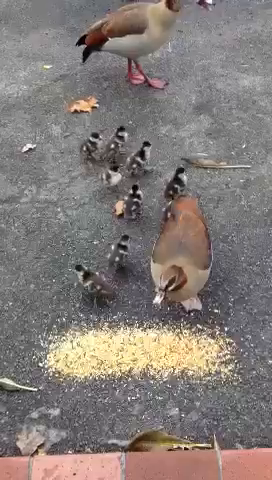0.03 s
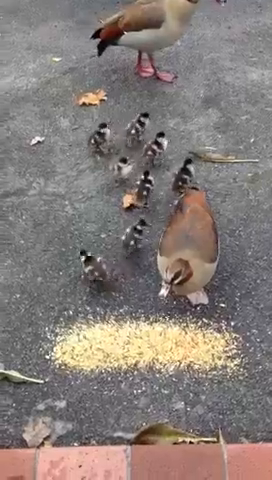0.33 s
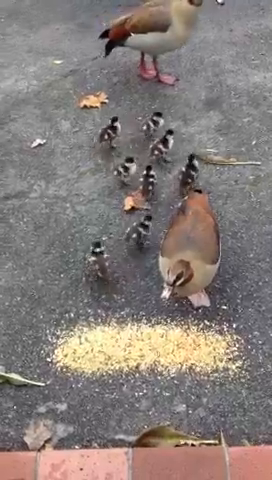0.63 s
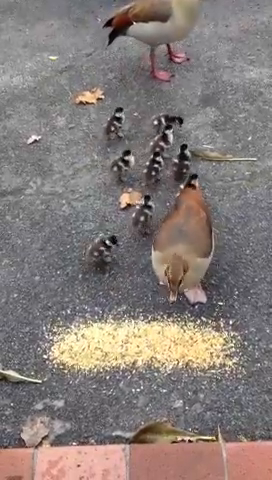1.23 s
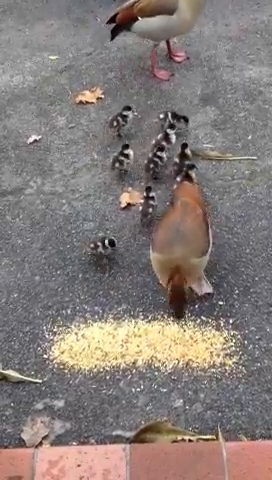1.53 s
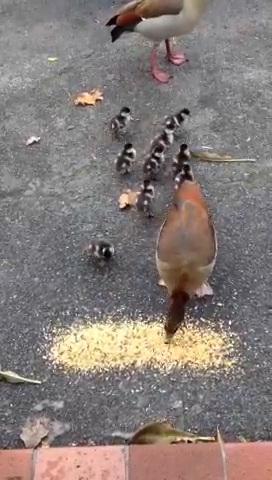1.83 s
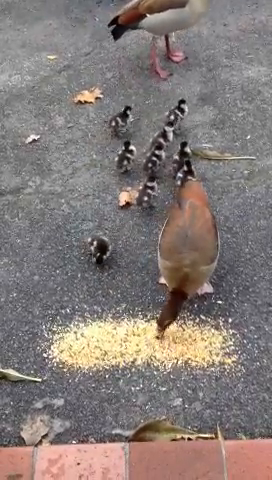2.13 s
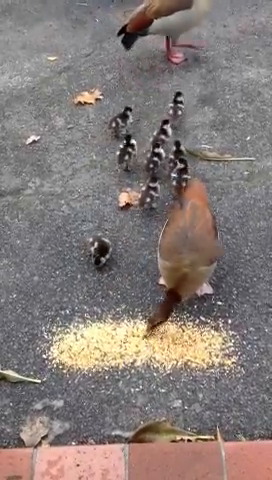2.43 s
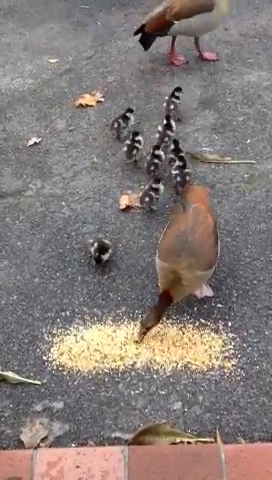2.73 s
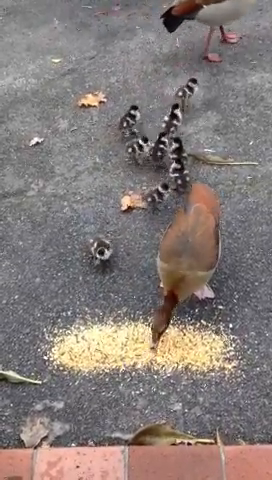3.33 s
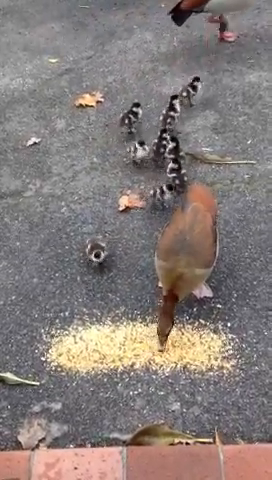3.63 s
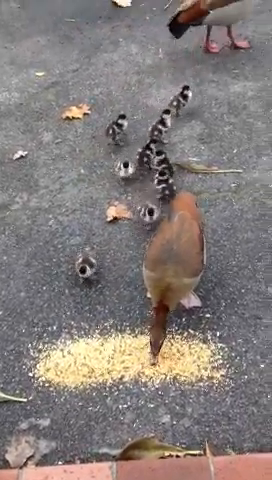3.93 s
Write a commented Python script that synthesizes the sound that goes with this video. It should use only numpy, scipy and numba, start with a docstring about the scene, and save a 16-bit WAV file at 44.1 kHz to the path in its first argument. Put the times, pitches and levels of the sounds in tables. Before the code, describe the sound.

Short raspy hisses from a feeding goose repeat outdoors as gusts rumble hard on the microphone. Its bill ticks lightly on grain and pavement, goslings peep faintly, and a second goose quacks twice near the end.

```python
"""A paved drive in a faint outdoor hush, one microphone out in the wind. From the start a goose gives
short hoarse, hissing calls, air rasping through its windpipe, and a bill soon pecks at scattered grain.
About a second in, gusts begin to buffet the microphone hard. Goslings peep three thin, falling whistles.
Near three seconds the mate answers with a rough, pulsing quack and a softer second one,
while the patter of grain thickens and the goose calls on."""
import sys
import numpy as np
from scipy import signal
from scipy.fft import rfft, irfft, next_fast_len
from scipy.io import wavfile
from scipy.ndimage import uniform_filter1d
from numba import njit

SR = 44100
rng = np.random.default_rng(int(sys.argv[2]) if len(sys.argv) > 2 else 0)


def output_pcm(signal):
    """Save a mono or channel-first signal as 16-bit PCM at the path in sys.argv[1].

    Samples are clipped to [-1, 1] before scaling.
    """
    pcm = np.clip(np.atleast_2d(signal).T, -1, 1) * 32767
    wavfile.write(sys.argv[1], SR, np.round(pcm).astype(np.int16))


N = 176400

# spectrum of a tick on the pavement, from bill or grain (frequency [Hz], level [dB])
TICK_SPECTRUM = [(1000, -21), (3000, -13), (6000, -8), (8000, 0), (10000, -8.5), (12000, -4), (16000, -14)]


def undb(db):
    """Decibels to gain."""
    return 10 ** (np.asarray(db) / 20)


def unit(x):
    """Scale to rms 1."""
    return x / np.sqrt(np.mean(x ** 2) + 1e-18)


def shaped(x, gain):
    """Filter by a gain that is a function of frequency."""
    size = next_fast_len(len(x) + 2048)
    hz = np.maximum(np.fft.rfftfreq(size, 1 / SR), 1)
    return irfft(rfft(x, size) * gain(hz), size)[:len(x)]


def noise(count, gain):
    """Noise of rms 1, coloured by a gain that is a function of frequency."""
    return unit(shaped(rng.standard_normal(count), gain))


def colour(points, f):
    """Gain of (frequency [Hz], level [dB]) points joined on a log axis."""
    hz, db = np.array(points).T
    return undb(np.interp(np.log(f), np.log(hz), db))


def resonances(modes, f, skirt=1.42):
    """Gain of steep-skirted resonances (frequency [Hz], width [Hz], level [dB]), summed in power."""
    return np.sqrt(sum(undb(db) ** 2 / (1 + (2 * (f - hz) / width) ** 2 / skirt) ** skirt
                       for hz, width, db in modes))


def flutter(count, per_s):
    """Smooth random wobble of rms 1."""
    k = max(int(SR / per_s), 2)
    smoothed = uniform_filter1d(rng.standard_normal(count + 2 * k), k)
    return unit(uniform_filter1d(smoothed, k // 2)[k:-k])


def swell(t, length, attack_s, release_s):
    """Rounded attack, hold and release."""
    rise = np.sin(np.pi / 2 * np.clip(t / attack_s, 0, 1)) ** 2
    fall = np.sin(np.pi / 2 * np.clip((length - t) / release_s, 0, 1)) ** 2
    return rise * fall


def clock(length):
    """Sample times of one event."""
    return np.arange(int(length * SR)) / SR


def add(out, start, x):
    """Mix an event in at its time."""
    i = int(start * SR)
    x, i = x[max(-i, 0):], max(i, 0)
    out[i:i + len(x)] += x[:max(N - i, 0)]


@njit
def lowpass(x, hz, damping):
    """State-variable low-pass with a moving edge."""
    y, band_state, low_state = np.empty(len(x)), 0., 0.
    for i in range(len(x)):
        g = np.tan(np.pi * hz[i] / SR)
        band = (band_state + g * (x[i] - low_state)) / (1 + g * (g + damping))
        y[i] = low_state + g * band
        band_state, low_state = 2 * band - band_state, 2 * y[i] - low_state
    return y


def hush():
    """Faint open air around the drive, its level barely wavering."""
    # outdoor air, lower and upper spectrum (frequency [Hz], level [dB])
    lows = [(25, -15), (60, -18), (130, 7.5), (300, 7), (550, -2.5)]
    highs = [(470, 9), (800, 2), (1030, 4), (1230, 1.5), (2500, -2.5), (4540, -1), (5080, -4), (7640, -4),
             (14200, -13), (15500, -19)]
    return noise(N, lambda f: colour(lows + highs, f)) * undb(-47 + .5 * flutter(N, per_s=15))


def wall_echo(x):
    """The direct sound plus a dull, thin tail from the walls around the drive."""
    t60_s, delay_s, damping_hz, echo_db = .28, .0091, 2830, -16.5
    t = clock(.8)
    tail = noise(len(t), lambda f: 1 / np.hypot(1, f / damping_hz))
    tail *= np.exp(-np.log(1000) * t / t60_s) * (t > delay_s)
    tail /= np.sqrt(np.sum(tail ** 2))
    return x + undb(echo_db) * signal.fftconvolve(x, tail)[:N]


def rumble(gust_db):
    """Eddies rumble on the microphone, louder and brighter as the wind rises."""
    low_hz, octaves_per_db = 132.7, .0614
    db = gust_db + 4 * np.clip(flutter(N, per_s=67.7), -2.5, 1.3)
    top_hz = np.clip(333.4 * 2 ** (octaves_per_db * (db + 20.5)), 150, 1500)
    air = noise(N, lambda f: (f / low_hz) ** -.3 / np.sqrt(1 + (low_hz / f) ** 8))
    air = lowpass(air, top_hz, .96)
    air = lowpass(air, top_hz * 1.93, 1.9)
    return unit(air) * undb(db - 6.5)


def add_thump(out, at, gain, hz, cycles=.81):
    """Mix in one brief swing of air pressure on the microphone, centred on its time."""
    t = clock(.05) - .025
    pressure = np.sin(2 * np.pi * hz * t) / np.cosh(np.sqrt(2) * t * hz / cycles)
    add(out, at + t[0], gain * pressure)


def puffs(gust_db, per_s=80):
    """Uneven puffs of air thump the microphone, harder and higher in gusts."""
    out = np.zeros(N)
    draws = np.clip(rng.standard_normal((int(per_s * N / SR), 4)), -2, 2)
    for k, (timing, size, pitch, side) in enumerate(draws):
        at = (k + .3045 * timing) / per_s
        wind_db = gust_db[int(np.clip(at * SR, 0, N - 1))]
        octaves = .46 * pitch
        hz = 287.3 * 2 ** (octaves + .0307 * (wind_db + 24.5))
        db = wind_db + 2.5 + 4 * min(size, 1) - 3 * octaves
        add_thump(out, at, np.sign(side) * undb(db), hz)
    return out


def wind():
    """Gusts right on the microphone: rumble, puffs and single hard buffets."""
    # strength of the wind (time [s], relative level [dB])
    gusts = [(0, -68), (.2, -41), (.27, -34.5), (.41, -49), (.455, -32.5), (.52, -49), (0.819, -48),
             (0.911, -19.5), (1.049, -21), (1.089, -31), (1.33, -33), (1.432, -20), (1.54, -23.5),
             (1.65, -20), (1.75, -24), (1.85, -21.5), (1.96, -30.5), (2.02, -45.5), (2.12, -28.5),
             (2.24, -33), (2.32, -29.5), (2.46, -36), (2.56, -47.5), (2.68, -46.5), (2.728, -23),
             (2.9, -23.5), (3.042, -26.5), (3.1, -46.5), (3.2, -29.5), (3.31, -41.5), (3.399, -29),
             (3.51, -38.5), (3.578, -26.5), (3.66, -38.5), (3.78, -32), (3.89, -24.5), (4, -31)]
    # hard blows of air (time [s], level [dB], pitch [Hz])
    buffets = [(.333, -27.5, 204), (0.903, -21.5, 380), (1.034, -14, 356), (1.244, -20, 214),
               (1.366, -14, 246), (1.422, -11, 237), (1.435, -11.5, 207), (1.453, -10.5, 414),
               (1.466, -11, 460), (1.563, -16, 376), (1.717, -17.5, 326), (1.786, -14, 530),
               (1.792, -7.5, 275), (1.797, -24, 1480), (1.799, -5, 160), (1.839, -11, 295),
               (1.854, -23, 750), (2.28, -12, 278), (2.895, -12.5, 343), (3.003, -11, 335),
               (3.036, -10, 222), (3.862, -13.5, 280), (3.879, -7.5, 202)]
    gust_db = np.interp(np.arange(N) / SR, *np.array(gusts).T)
    out = rumble(gust_db) + puffs(gust_db)
    for at, db, hz in buffets:
        add_thump(out, at, undb(db), hz)
    return out


def grain_patter(full_per_s=300, decay_s=.0036):
    """Grains tick on the pavement at random, more often as the goose feeds."""
    # pace of feeding (time [s], share of the full grain rate [0-1])
    feeding = [(1.7, 0.17), (2.9, 0.57), (3.4, 0.64)]
    per_s = full_per_s * np.interp(np.arange(N) / SR, *np.array(feeding).T)
    hits = rng.random(N) < per_s / SR
    hit_db = -53.5 + 6 * np.clip(rng.standard_normal(N), -2, 1)
    envelope = signal.fftconvolve(hits * undb(hit_db), np.exp(-clock(.03) / decay_s))[:N]
    return envelope * noise(N, lambda f: colour(TICK_SPECTRUM, f))


def pecks(tick_decay_s=.0033, knock_decay_s=.0027):
    """A bill strikes grain and pavement: a sharp tick over a lower knock."""
    # strikes (time [s], relative tick level [dB], relative knock level [dB])
    strikes = [(0.5867, -36.5, -31), (0.8289, -31, -42), (1.2465, -35, -48), (1.8452, -29, -45),
               (2.014, -33, -34.5), (2.102, -37, -54), (2.612, -30, -38), (3.005, -31, -51),
               (3.0698, -26, -30), (3.083, -26, -37), (3.3163, -31.5, -53), (3.3994, -33, -49),
               (3.4465, -43, -62), (3.687, -31, -40), (3.7457, -30, -35.5), (3.8463, -20.5, -53)]
    out, t = np.zeros(N), clock(.03)
    for start, tick_db, knock_db in strikes:
        tick = noise(len(t), lambda f: colour(TICK_SPECTRUM, f)) * np.exp(-t / tick_decay_s)
        knock = noise(len(t), lambda f: resonances([(3600, 2000, 0)], f)) * np.exp(-t / knock_decay_s)
        add(out, start, undb(tick_db - 7.5) * tick + undb(knock_db - 6) * knock)
    return out


def gosling_peeps(fall_hz_per_s=32000):
    """The goslings' thin, wobbling, falling whistles, faint at the microphone."""
    # peeps (time [s], length [s], starting pitch [Hz], level [dB])
    peeps = [(1.482, 0.076, 7300, -47), (1.681, 0.058, 7600, -49), (1.932, 0.043, 6670, -48)]
    out = np.zeros(N)
    for start, length, hz, db in peeps:
        t = clock(length)
        pitch = (hz - fall_hz_per_s * t) * (1 + .045 * flutter(N, per_s=700)[:len(t)])
        rough_db = 3 * flutter(N, per_s=250)[:len(t)]
        envelope = undb(db + rough_db) * swell(t, length, length / 2, length / 2)
        add(out, start, envelope * np.sin(2 * np.pi * np.cumsum(pitch) / SR))
    return out


def mate_quacks(pitch_hz=228.7, jitter=.23):
    """Uneven pulses with a puff of air each, through the mate's throat."""
    # quacks (time [s], length [s], level [dB])
    quacks = [(2.824, 0.1, -32), (3.186, 0.071, -39.5)]
    # throat resonances (frequency [Hz], width [Hz], level [dB])
    throat = [(1062, 44, -4), (1505, 185, -4), (1983, 85, -3.5), (2520, 120, -22), (4430, 310, -18.5),
              (5750, 180, -22)]
    out, t = np.zeros(N), clock(.2)
    for start, length, db in quacks:
        cycles = np.cumsum(pitch_hz * (1 + jitter * flutter(len(t), pitch_hz))) / SR
        pulses = unit(np.diff(np.floor(cycles), prepend=0))
        breath = unit(np.exp(-3 * (cycles % 1)) * rng.standard_normal(len(t)))
        voice = unit(shaped(pulses + .75 * breath, lambda f: resonances(throat, f)))
        add(out, start, undb(db) * voice * swell(t, length, attack_s=.024, release_s=.034))
    return out


def pavement_bounce(f, lag_s):
    """Gain of the direct path plus a later one off the pavement, weaker below 2500 Hz."""
    return 1 + undb(-11) * np.exp(-2j * np.pi * f * lag_s) * np.minimum(f / 2500, 1)


def goose_hisses(split_hz=2500, arch_db=14.5):
    """Rasping air rings windpipe, throat and bill; the treble swells later and fades sooner."""
    # calls (time [s], length [s], level [dB], lowest windpipe resonance [dB], throat resonance [Hz],
    # mouth resonance [Hz], bill resonance [Hz], upper band [dB], treble [dB])
    calls = [(-.01, .15, -28, 4, 1244, 3300, 4630, 0.72, 1.5),
             (.354, 0.15, -28, 9.5, 1320, 3760, 4440, -0.61, 2.5),
             (.864, 0.15, -26.5, 12, 1250, 3720, 4380, 0.66, 1.5),
             (1.566, 0.15, -27.5, -1, 1330, 3450, 4300, -1, -1),
             (2.1, 0.17, -28.5, 1.5, 1360, 3390, 4160, -2.8, -4),
             (2.458, 0.15, -28.5, 1.5, 1320, 3610, 4200, -0.45, -3.5),
             (3.081, 0.16, -29.5, 3, 1380, 3560, 4170, -1.8, -2),
             (3.516, .152, -30, 3, 1450, 3770, 4500, -2.7, -4),
             (3.925, 0.18, -29.5, 1, 1410, 3730, 4330, -0.79, -7)]
    # higher windpipe resonances (frequency [Hz], width [Hz], level [dB])
    windpipe = [(1676, 110, -9), (1990, 61, -9), (2290, 49, -8.5), (2767, 87, -8), (3227, 78, -7),
                (3840, 200, -13), (4700, 58, -10), (5460, 75, -12), (5920, 130, -15.5), (6490, 100, -15.5),
                (7850, 190, -23), (8200, 130, -26)]
    # turbulence between the resonances (frequency [Hz], level [dB])
    breath = [(300, -46), (700, -13.5), (1000, -15), (2000, -18), (3000, -20), (4400, -11), (5200, -22),
              (7000, -23), (9500, -39.5), (12000, -33.5), (16000, -41.5)]
    out, t = np.zeros(N), clock(.2)
    for start, length, db, ring_db, throat_hz, mouth_hz, bill_hz, upper_db, treble_db in calls:
        modes = [(hz * (1 + .0035 * rng.standard_normal()), width, level)
                 for hz, width, level in windpipe]
        modes += [(1063, 38, ring_db), (throat_hz, 185, 1), (mouth_hz, 69, -3), (bill_hz, 114, -3.5)]
        tilt = [(2200, 0), (3200, upper_db), (4700, upper_db), (5800, treble_db)]
        airway = lambda f: np.hypot(resonances(modes, f), colour(breath, f)) * colour(tilt, f)
        lag_s = .0027 + .000409 * rng.standard_normal()  # the head moves between calls
        air = noise(len(t), lambda f: airway(f) * pavement_bounce(f, lag_s))
        low = shaped(air, lambda f: 1 / (1 + (f / split_hz) ** 6))
        arch = undb(-arch_db * (2 * t / length - 1) ** 2)  # loudest in mid-call
        effort = swell(t, length, attack_s=.051, release_s=.064) * arch
        add(out, start, undb(db) * (low * effort + (air - low) * effort ** 1.23))
    return out


def scene():
    """Hush and wind at one microphone; the geese and their feeding echo off the walls."""
    background = hush() + wind()
    geese = grain_patter() + pecks() + gosling_peeps() + mate_quacks() + goose_hisses()
    return (background + wall_echo(geese))[None]


def record(dry):
    """The recorder thins the deep bass and cuts the top."""
    low_hz, top_hz = 70, 15550
    thinned = shaped(dry[0], lambda f: 1 / np.sqrt(1 + (low_hz / f) ** 4))
    top_cut = signal.ellip(10, .2, 70, top_hz, fs=SR, output="sos")
    return signal.sosfilt(top_cut, thinned)[None]


dry = scene()
out = record(dry)
output_pcm(out)
```